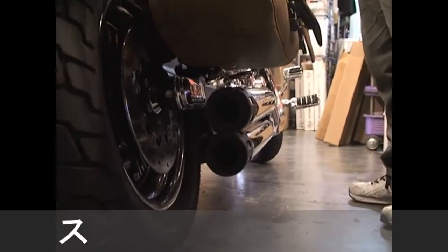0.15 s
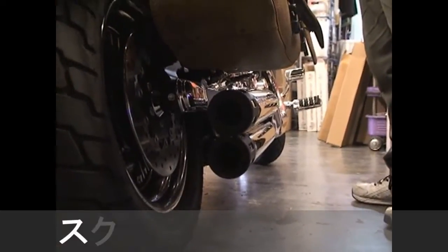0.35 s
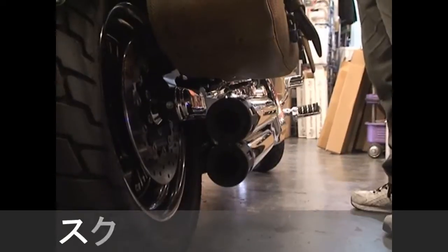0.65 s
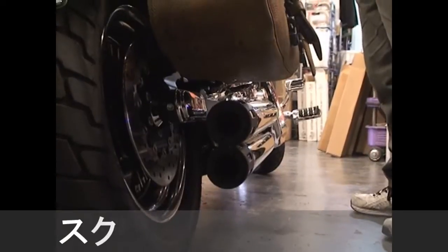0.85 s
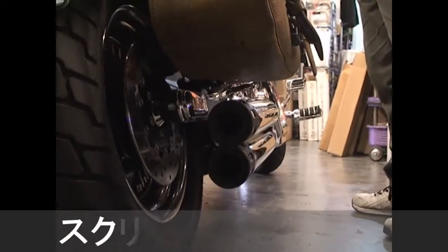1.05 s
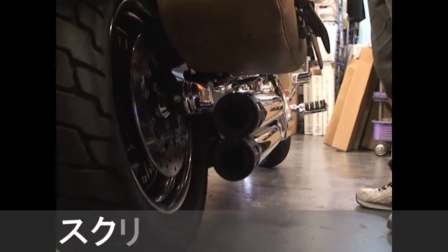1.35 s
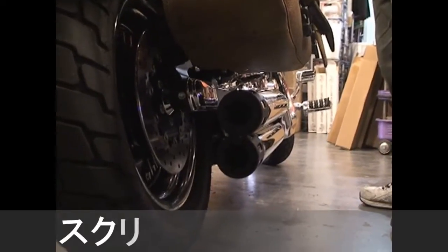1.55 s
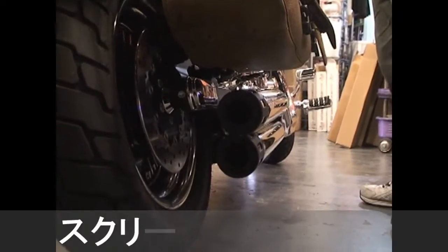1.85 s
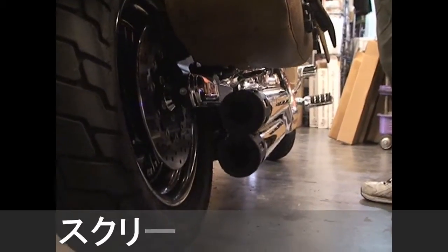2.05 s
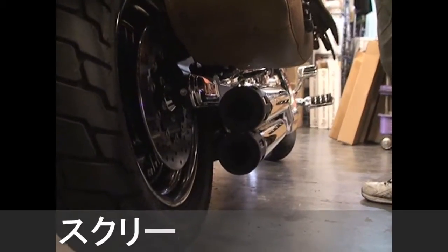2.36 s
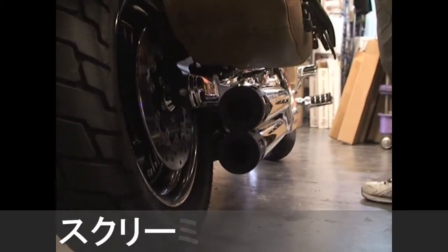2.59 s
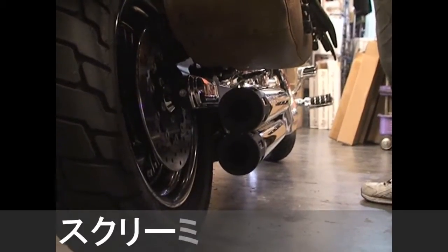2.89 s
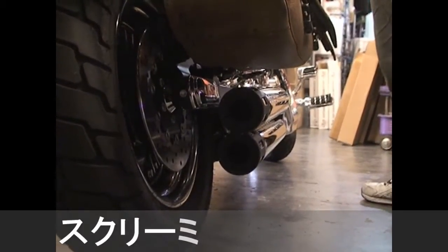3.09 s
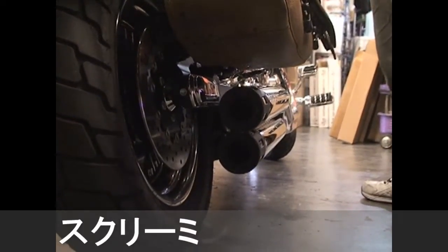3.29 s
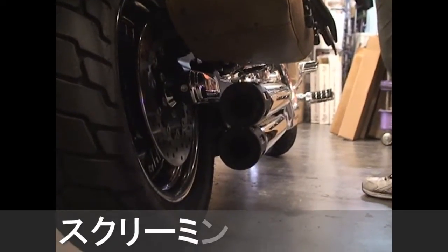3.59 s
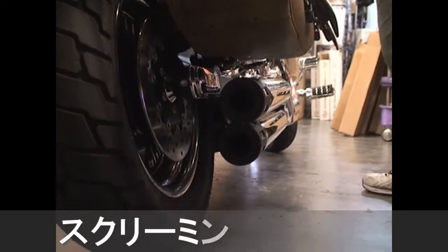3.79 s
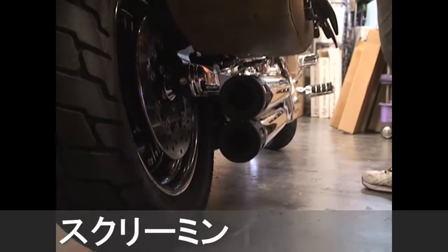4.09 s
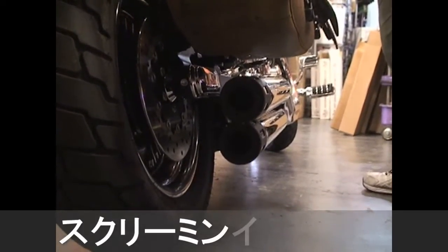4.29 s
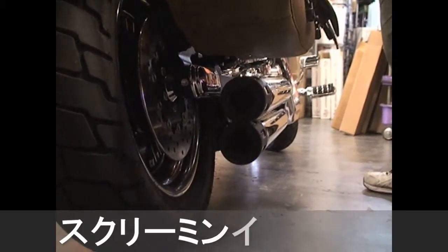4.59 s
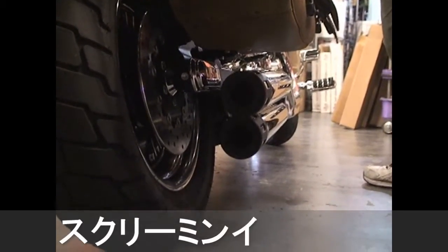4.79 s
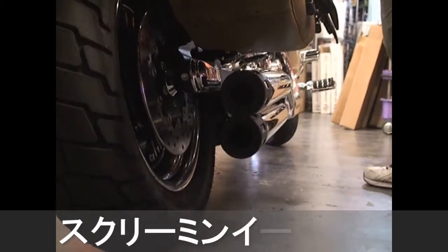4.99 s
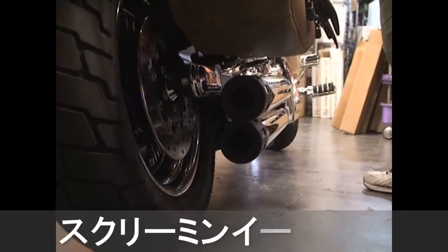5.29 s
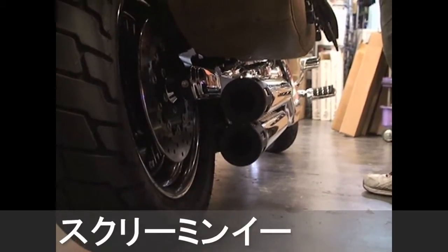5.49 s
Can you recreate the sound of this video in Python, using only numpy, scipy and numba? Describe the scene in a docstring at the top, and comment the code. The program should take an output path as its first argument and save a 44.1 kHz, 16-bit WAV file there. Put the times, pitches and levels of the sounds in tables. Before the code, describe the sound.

A hard-surfaced workshop with low ventilation rumble, faint hiss and a soft hum. At 0.2 s a small sharp plastic switch snap, then a double snap, stronger on its second click, near 0.75 s. At 1.5 s the starter clanks in with a bright scrape and noisy gear grinding; its rough whine races, sags and slams in again around 1.9 and 2.1 s, with dull thuds and soft exhaust chuffs. At about 2.16 s the big V-twin catches with a rich bark and quick rise, the starter dropping out by 2.4 s. Until 4.7 s it runs at a fast, uneven paired-beat idle: deep boom, spitting gas, hollow cracks, tapping valves and chain rattle. At 4.75 s the throttle snaps open with an airy intake rasp and thin whistles, the beats crowding into a roar; a second, smaller blip comes at 5.15 s, falling toward idle by 5.6 s. Microphone close behind the mufflers, with short room reflections.

```python
"""A big V-twin motorcycle engine catches, idles in uneven pairs of beats and is blipped, close behind its two mufflers.
Each beat rings pipes, headers and mufflers and spits a burst of gas noise; the valve gear taps and clatters.
Before it fires, switches snap and the starter's gear teeth grind noisily through three compressions.
Ventilation noise and hum lie beneath, and decaying diffuse reflections give the hard room of a workshop."""
import sys
import numpy as np
from scipy import signal
from scipy.fft import rfft, irfft
from scipy.io import wavfile
from scipy.ndimage import uniform_filter1d
from numba import njit

SR = 44100
rng = np.random.default_rng(int(sys.argv[2]) if len(sys.argv) > 2 else 0)


def unload_wav(signal):
    """Save mono or channel-first audio to the path in sys.argv[1] as 16-bit WAV at rate SR, clipped to [-1, 1]."""
    wavfile.write(
        sys.argv[1],
        SR,
        np.round(np.clip(np.atleast_2d(signal).T, -1, 1) * 32767).astype(np.int16),
    )


N = 249165
T = np.arange(N) / SR

# crankshaft speed once the engine fires: (time [s], speed [turns/min])
CRANK_SPEED = [(2.16, 1003.0), (2.32, 1251.0), (2.41, 1402.0), (3.15, 1347.0), (3.29, 1294.0),
               (3.56, 1350.0), (3.67, 1304.0), (4.71, 1200.0), (4.88, 2126.0), (5.14, 2212.0),
               (5.23, 1894.0), (5.64, 1360.0)]
FIRST_BEAT_S = 2.16
# deep resonances of the rear cylinder's pipe: (frequency [Hz], width [Hz], level [dB], polarity [+1 or -1])
REAR_PIPE_MODES = [(49.3, 10.3, -6, -1), (102.8, 13, 5.5, 1), (172, 25.7, 1, 1), (168, 144, -7.5, -1),
                   (302, 45, -14.5, 1)]
# starter drive, racing after each compression and braked by the next:
# (time [s], tooth rate [Hz], relative whine level [dB])
STARTER_TEETH = [(1.5, 800, -42), (1.58, 940, -30), (1.6, 1000, -44), (1.65, 1410, -44), (1.665, 1430, -25),
                 (1.69, 1390, -23), (1.715, 1070, -23), (1.745, 1060, -29), (1.78, 1120, -24),
                 (1.805, 760, -28), (1.835, 570, -21), (1.865, 550, -32), (1.893, 520, -42),
                 (1.897, 1520, -29), (1.92, 1130, -21), (1.955, 740, -25), (1.982, 560, -23),
                 (2.01, 500, -35), (2.078, 450, -48), (2.085, 1750, -30), (2.11, 1180, -23),
                 (2.132, 830, -24), (2.152, 790, -27), (2.162, 580, -16), (2.178, 540, -17),
                 (2.21, 520, -45)]


def undb(db):
    """Decibels to gain."""
    return 10 ** (np.asarray(db) / 20)


def curve(rows, axis=1):
    """One column of a table, joined by straight lines in time."""
    rows = np.array(rows)
    return np.interp(T, rows[:, 0], rows[:, axis])


def unit(x, span=slice(None)):
    """Scale to rms 1 within a span."""
    return x / np.sqrt(np.mean(x[..., span] ** 2))


def noise():
    """White noise."""
    return rng.standard_normal(N)


def waver(samples):
    """Random drift of rms 1: white noise averaged over a number of samples."""
    return unit(uniform_filter1d(noise(), size=samples))


def colour(x, points):
    """Causal minimum-phase filter of unit power through (frequency [Hz], relative level [dB]) points."""
    hz, db = np.transpose(points)
    size = 4096
    bins_hz = np.arange(size // 2 + 1) * SR / size
    gain = unit(undb(np.interp(np.log(bins_hz + 1), np.log(hz), db)))
    # folding the cepstrum forward in time makes the filter causal
    cepstrum = irfft(np.log(gain))
    cepstrum[1:size // 2] *= 2
    cepstrum[size // 2 + 1:] = 0
    impulse = irfft(np.exp(rfft(cepstrum)))
    return signal.fftconvolve(x, impulse)[:N]


@njit
def resonate(x, hz, width):
    """Band-pass with a moving centre, gain 1 there."""
    y, band, low = np.empty(len(x)), 0., 0.
    for i in range(len(x)):
        g = np.tan(np.pi * hz[i] / SR)
        damping = width / hz[i]
        # the tiny offset keeps the states out of very slow, denormal numbers
        v = (band + g * (x[i] + 1e-18 - low)) / (1 + g * (g + damping))
        band = 2 * v - band
        low = low + 2 * g * v
        y[i] = damping * v
    return y


def ring(x, modes, stretch=1):
    """A bank of (frequency [Hz], width [Hz], level [dB]) resonances, all frequencies times stretch."""
    return sum(undb(db) * resonate(x, hz * stretch * np.ones(N), float(width)) for hz, width, db in modes)


def strikes(times, sizes):
    samples = np.maximum(np.asarray(times) * SR, 0).astype(int)
    return np.bincount(samples, sizes, N)[:N]


def fade(x, decay_s):
    """Give each impulse an exponential tail."""
    return signal.lfilter([1], [1, -np.exp(-1 / (abs(decay_s) * SR))], x)


def place(x, pan_db, room_db, t60=0.2, first_s=0.00492):
    """Direct sound, left minus right in dB, plus diffuse reflections that differ at each ear."""
    t = T[:SR // 2]
    tail = rng.standard_normal((2, len(t))) * np.exp(-np.log(1000) * t / t60) * (t > first_s)
    tail /= np.sqrt(np.sum(tail ** 2, axis=1, keepdims=True))
    reflections = signal.fftconvolve(x[None], tail, axes=1)[:, :N]
    return (x + undb(room_db) * reflections) * undb([[pan_db / 2], [-pan_db / 2]])


def ports(x, pan_db):
    """Close to the pipes both channels carry the same wave, shifted in level and phase."""
    # phase by which left leads right: (frequency [Hz], lead [radians])
    port_phase = [(0, 0), (60, 0.83), (110, 0.37), (200, 0.67), (400, 0.97)]
    hz, lead = np.transpose(port_phase)
    turn = np.exp(.5j * np.interp(np.arange(N // 2 + 1) * SR / N, hz, lead))
    return irfft(rfft(x) * np.array([turn, turn.conj()]), N) * undb([[pan_db / 2], [-pan_db / 2]])


def workshop():
    """Ventilation rumbles and hisses, wavering a little in level, over hums made of narrow noise bands."""
    # ventilation noise: (frequency [Hz], relative level [dB])
    air_colour = [(15, -30), (25, -15), (48, -8.5), (66, -21), (103, -21), (130, -13), (183, -13.5),
                  (237, -13), (342, -17.5), (370, -21.5), (770, -29), (878, -29), (3080, -38.5),
                  (9500, -42), (13000, -53)]
    # ventilation hums: (frequency [Hz], level [dB])
    hum_tones = [(98, -49), (340, -59), (888, -69.5)]
    hum = sum(undb(db) * unit(ring(noise(), [(hz, 6, 0)])) for hz, db in hum_tones)
    air = unit(colour(noise(), air_colour)) * undb(1.0 * waver(SR // 8))
    return place(undb(-48.5) * air + hum, 0.18, -6.0)


def switches():
    """Handlebar switches: small, sharp plastic snaps of noise that ring their housing."""
    # snaps: (time [s], relative level [dB])
    snap_events = [(0.211, -25.5), (0.7477, -24.5), (0.7664, -18)]
    # colour of the snaps: (frequency [Hz], relative level [dB])
    snap_colour = [(1500, -35), (2500, -17), (3200, -7), (4100, -6), (5300, -1), (6900, -1), (8300, -3),
                   (9500, -8), (12000, -11), (14000, -15)]
    # ringing of the housing: (frequency [Hz], width [Hz], level [dB])
    housing_modes = [(3200, 500, 4), (5300, 450, 3), (6900, 500, -2), (8350, 600, -6)]
    s, db = np.transpose(snap_events)
    snap = fade(strikes(s, undb(db)), 0.0019) * noise()
    snap = snap + ring(snap, housing_modes)
    return place(undb(-3.0) * colour(snap, snap_colour), 2.7, -6.5, t60=0.26)


def cranking():
    """Tooth rate and grinding dB: each stroke takes hold, stays loud and dies away; faster teeth are louder."""
    # heaves over a compression:
    # (takes hold [s], starts to die away [s], relative grinding level [dB], decay [s])
    strokes = [(1.503, 1.715, -18, 0.52), (1.9, 1.946, -16, 0.18), (2.077, 2.113, -17, 0.41)]
    free_tooth_hz, grind_db_per_octave = 1450, 2.5  # tooth rate between compressions; rise with tooth rate
    hz, db = curve(STARTER_TEETH), np.full(N, -np.inf)
    for start, loudest, top_db, decay_s in strokes:
        dying = np.exp(-np.maximum(T - loudest, 0) / decay_s)
        db = np.where(T >= start, top_db + 20 * np.log10(dying), db)
    return hz, db + grind_db_per_octave * np.log2(hz / free_tooth_hz)


def starter():
    """Gear teeth strike unevenly and ring the case; the drive slams in again after each compression."""
    # colour of grinding and metal blows: (frequency [Hz], relative level [dB])
    grind_colour = [(71, -77), (120, -19), (190, 4), (474, -8), (556, -0.5), (614, 2.5), (1450, -5),
                    (1570, -7), (1760, -0.5), (1990, -4), (4500, -2.5), (9980, -14.5), (12700, -48),
                    (14000, -82)]
    # ringing of the gear case: (frequency [Hz], width [Hz], level [dB])
    case_modes = [(566, 34, 8), (805, 30, 8), (1070, 60, 7), (1410, 20, 8), (1760, 70, 10), (2517, 25, 8),
                  (2842, 14, 23), (3890, 25, 7), (4450, 77, 3), (7170, 90, 3), (7750, 90, 6)]
    # gear mesh tone and overtones: (multiple of the tooth rate, relative level [dB])
    mesh_orders = [(1, 0), (2, -10), (3, -16)]
    # blows of the drive and first coughs: (time [s], metal level [dB], thud level [dB], decay [s])
    drive_blows = [(1.493, -30, -59, 0.065), (1.529, -19, -24, 0.11), (1.824, -29, -13, 0.029),
                   (1.897, -21, -24, 0.15), (1.968, -28, -14.5, 0.015), (2.077, -22.5, -19, 0.029),
                   (2.157, -42, -21.5, 0.074)]
    # colour of the thuds: (frequency [Hz], relative level [dB])
    thud_colour = [(40, -4), (120, -5.5), (200, 9), (380, -2), (560, 6), (800, -5.5), (1300, -14),
                   (3000, -66)]
    on_s, off_s = 1.4995, 2.383
    engaged = np.clip((T - on_s) / 0.00059, 0, 1) * np.clip((off_s - T) / 0.053 + .5, 0, 1)
    mesh_hz, grind_db = cranking()
    effort = engaged * undb(grind_db)
    # the tooth rate wavers, both quickly and more slowly
    tooth_hz = mesh_hz * (1 + .035 * waver(150) + 0.012 * waver(900))
    # one impulse of random strength for each tooth
    contacts = np.diff(np.floor(np.cumsum(tooth_hz) / SR), prepend=0) * undb(6.3 * np.minimum(noise(), 2))
    rasp = unit(unit(contacts - contacts.mean()) + 2.0 * noise())

    # backlash smears the mesh tone and its overtones into a rough, gliding whine
    turn = 2 * np.pi * np.cumsum(tooth_hz) / SR
    whine = unit(sum(undb(db + 4 * waver(200)) * np.sin(order * turn) for order, db in mesh_orders))
    whine = whine * engaged * undb(-1.5 + curve(STARTER_TEETH, axis=2))

    # a broad rasp follows just below the mesh tone
    churn = ring(rasp, [(0.81, 700, 0)], tooth_hz)
    churn = unit(ring(churn, [(1060, 5600, 0)]))
    # the pinion scrapes brightly as it goes home
    scrape = unit(ring(ring(noise(), [(6750, 4000, 0)]), [(7060, 3700, 0)]))
    scrape = scrape * np.exp(-np.maximum(T - on_s, 0) / 0.13)
    gears = undb(-1.5) * colour(rasp, grind_colour) + undb(-13.0) * unit(ring(rasp, case_modes))
    gears = effort * (gears + undb(-10) * churn + undb(2.0) * scrape)

    metal = sum(undb(db) * fade(strikes([s], [1]), decay) for s, db, _, decay in drive_blows)
    thuds = sum(undb(db) * fade(strikes([s], [1]), decay) for s, _, db, decay in drive_blows)
    blows = colour(metal * noise(), grind_colour) + colour(thuds * noise(), thud_colour)
    return place(gears + whine + blows, -1.1, -5.0, t60=0.28)


def chuffs():
    """Unfired charges pushed out while cranking thump softly in the rear pipe's resonances."""
    # thumps: (time [s], relative level [dB])
    chuff_events = [(1.825, 14), (1.892, 19), (1.997, 31.5)]
    s, db = np.transpose(chuff_events)
    charges = strikes(s, undb(db))
    thumps = sum(np.sign(sign) * ring(charges, [mode]) for *mode, sign in REAR_PIPE_MODES)
    return ports(thumps, -2.0)


def gulp():
    """The snapped-open throttle rasps, and thin whistles glide at the edge of its plate."""
    # rasp while the engine gulps air: (time [s], level [dB])
    rasp_level = [(4.76, -60), (4.81, -27), (4.885, -27), (4.95, -30), (4.98, -60)]
    # whistles at the throttle plate: (starts [s], ends [s], first pitch [Hz], last pitch [Hz], level [dB])
    whistles = [(4.752, 4.83, 5480, 5640, -31), (4.785, 4.828, 7850, 7620, -28),
                (4.86, 4.965, 5720, 5280, -34)]
    band = [(6200, 2800, 0)]
    out = unit(ring(ring(noise(), band), band)) * undb(curve(rasp_level))
    out = out * (T > rasp_level[0][0]) * (T < rasp_level[-1][0])
    for start, end, first_hz, last_hz, db in whistles:
        hz = curve([(start, first_hz), (end, last_hz)])
        mode = [(1, 110, 0)]  # a 110 Hz wide band that follows the glide
        swell = np.sqrt(np.abs(np.sin(np.pi * np.clip((T - start) / (end - start), 0, 1))))
        out = out + undb(db) * swell * unit(ring(ring(noise(), mode, hz), mode, hz))
    return place(out, -1.1, -10.0)


def crank_times(angle):
    """Times at which the two-turn cycle passes an angle (in cycles)."""
    cycles = np.cumsum(curve(CRANK_SPEED) * (T > FIRST_BEAT_S)) / SR / 120  # two turns a cycle
    return np.interp(np.arange(angle, cycles[-1]) + 1e-9, cycles, T)


def throttle_opening():
    """Each twist opens the throttle, holds it and lets it fall shut."""
    # twists: (opens [s], starts to close [s], opening [0-1])
    twists = [(2.16, 2.27, 0.52), (4.741, 4.992, 1), (5.153, 5.43, 0.52)]
    open_s, close_s = 0.038, 0.21
    return sum(opening * np.clip((T - opens) / open_s, 0, 1) * np.clip(1 - (T - closes) / close_s, 0, 1)
               for opens, closes, opening in twists)


def intake_rush(throttle, running):
    """Air drawn past the open throttle hisses in proportion to its opening."""
    # colour of the rush: (frequency [Hz], relative level [dB])
    intake_colour = [(1000, 14), (4000, -9), (5800, 1), (7800, 7), (9000, -2), (10500, -0.5), (11800, 5),
                     (13500, -31)]
    return throttle * running * colour(noise(), intake_colour)


def chain_rattle(beats, running, idle_span):
    """Chain and gears rattle on between the valve taps, most just after a firing."""
    # colour of the rattle: (frequency [Hz], relative level [dB])
    rattle_colour = [(300, -4), (900, 7), (1600, -13.5), (3200, -5), (6400, -2.5), (8000, -5.5),
                     (9500, -10.5), (10500, -30), (11700, -12), (13000, -48)]
    shaken = 0.93 + 0.068 * unit(fade(strikes(beats, None), 0.077), idle_span)
    return colour(running * shaken * noise(), rattle_colour)


def valve_gear():
    """Valves close at fixed cam angles; each tap rings the rocker boxes in a different mix and tuning."""
    # valve closings: (cam angle [cycles], relative level [dB])
    closings = [(0.225, 12), (0.345, 11.5), (0.67, 13.5), (0.819, 4)]
    # ringing of the rocker boxes: (frequency [Hz], width [Hz], level [dB])
    rocker_modes = [(2355, 46, 9.5), (3360, 330, 3), (3870, 200, -6), (4720, 96, 7), (5690, 120, 5),
                    (6700, 270, 2.5)]
    detune, scatter_db, tap_s = 0.03, 4, 0.006  # random spread of pitch and level; decay
    times = np.concatenate([crank_times(angle) for angle, _ in closings])
    tap_db = np.concatenate([np.full(len(crank_times(angle)), db) for angle, db in closings])
    latest = np.searchsorted(np.sort(times), T)
    out = 0
    for mode in rocker_modes:
        chance = rng.uniform(-1.93, 1, (len(times) + 1, 2))
        taps = fade(strikes(times, undb(tap_db + scatter_db * chance[1:, 0])), tap_s) * noise()
        out = out + ring(taps, [mode], 1 + detune * chance[latest, 1])
    return out


def knocks(racing, heat, span):
    """Pressure waves running between the two pipes knock at fixed cam angles, a little different each cycle."""
    # knocks: (cam angle [cycles], frequency [Hz], width [Hz], relative level [dB])
    pipe_knocks = [(-0.015, 945, 270, -44.5), (0.214, 611, 110, -39), (0.21, 930, 200, -48),
                   (0.224, 313.7, 49, -33.5), (0.241, 324.8, 12.6, -36), (0.251, 197, 72, -28),
                   (0.395, 553, 150, -35), (0.455, 920, 200, -47), (0.482, 318, 53, -37.5),
                   (0.812, 572, 110, -41.5)]
    scatter_db, detune = 1.3, 0.02  # random spread from cycle to cycle
    out = 0
    for angle, hz, width, db in pipe_knocks:
        times = crank_times(angle % 1)
        chance = rng.standard_normal((len(times) + 1, 2))
        # retuned 5 ms before each knock begins
        tuning = heat * (1 + detune * chance[np.searchsorted(times - .005, T), 1])
        mode = [(hz, width, 0)]
        hits = strikes(times, undb(scatter_db * chance[1:, 0]))
        waves = ring(ring(hits, mode, tuning), mode, tuning)
        out = out + undb(db) * unit(waves, span)
    return out * undb(-9 * racing)  # softer as the engine races


def slap(beats):
    """The steep front of each puff leaves the muffler mouth as a short, hollow crack."""
    # ringing of the mouth: (frequency [Hz], width [Hz], level [dB])
    mouth_modes = [(650, 140, -11), (944, 71, -5), (1360, 710, -12)]
    pulses = strikes(beats, undb(4.7 * rng.standard_normal(len(beats))))
    burst = unit(fade(pulses, 0.0056)) * noise()
    return ring(unit(pulses) + undb(24.0) * burst, mouth_modes)


def gas_jet(beats):
    """The jet tears out just after each pressure front, in ragged bursts that each have their own colour."""
    # beats that crack out above the others: (time [s], extra level [dB])
    loud_cracks = [(2.161, 4), (2.453, 1), (2.552, 2), (2.624, 2.5), (2.8, 1), (3.015, 2.5), (3.283, 2.5),
                   (3.557, 3), (3.646, 4.5), (4.072, 2.5), (4.115, 1.5), (4.263, 2.5), (4.362, 4),
                   (4.701, 5.5), (4.75, 7), (4.786, 2), (4.8245, 3), (4.854, 3.5), (4.885, 6.5), (4.94, 5),
                   (5.2467, 7), (5.285, 6.5), (5.385, 7), (5.424, 8), (5.455, 6.5)]
    # colour of the gas jet: (frequency [Hz], relative level [dB])
    gas_colour = [(600, 11), (1700, -2), (3200, 6.5), (4500, 5.5), (6500, 6), (8000, 3), (9500, -2.5),
                  (10500, -14.5), (11700, -4.5), (13000, -105)]
    times, extra_db = np.sort(beats) + 0.00027, np.zeros(len(beats))
    for s, db in loud_cracks:
        nearest = np.argmin(abs(times - s))
        times[nearest], extra_db[nearest] = s, db
    # each burst's hiss peak is drawn around 4200 Hz
    peak_hz = 4200 * 2 ** (0.55 * rng.uniform(-0.75, 1, len(times) + 1))
    puffs = fade(fade(strikes(times, undb(extra_db)), 0.0024), 0.0024)
    jet = puffs * noise() * undb(2 * waver(30))
    jet = jet + ring(jet, [(0.98, 700, 3)], peak_hz[np.searchsorted(times, T)])
    return colour(jet, gas_colour)


def exhaust(beats, pipe, throttle, heat):
    """One cylinder: each blow-down rings its pipe, and the turbulent flow behind it rings it unevenly."""
    # resonances of the header pipes: (frequency [Hz], width [Hz], level [dB])
    header_modes = [(205, 30, -6), (245, 24, 0), (318, 20, 7), (390, 36, -1)]
    # overtones of the mufflers: (frequency [Hz], width [Hz], level [dB])
    muffler_modes = [(295, 30, 10), (402, 65, 5), (528, 135, 1.5), (640, 52, -19), (885, 10.7, 5.5),
                     (960, 31, -52), (1278, 48, -1), (1400, 62, -33), (1771, 48, -6), (1890, 25, -8.5),
                     (2240, 26, -4.5), (2650, 36, -16)]
    # low buffeting by each puff: (frequency [Hz], relative level [dB])
    buffet_colour = [(12, -20), (22, -6), (32, 2), (42, -4), (55, -18), (90, -27), (300, -48)]
    chance = rng.standard_normal((len(beats), 2)).T
    pulses = unit(strikes(beats + 0.00018 * chance[0], undb(1.0 * chance[1])))
    flow = unit(fade(pulses, .014)) * noise()

    # turbulence in the pipe grows with the throttle
    drive = pulses + undb(-19 + 11 * throttle) * flow
    boom = 0
    for hz, width, db, sign in pipe:
        # under throttle the boom narrows onto the strongest resonance, near 100 Hz
        narrowed = drive * undb(-9 * throttle * abs(np.log2(hz / 100)))
        boom = boom + np.sign(sign) * ring(narrowed, [(hz, width, db)], heat)

    # the headers get turbulence after each beat, and a steady roar between beats under throttle
    header_drive = pulses + undb(-7) * flow + undb(-9) * throttle ** 2 * noise()
    # the growl sinks as the throttle shuts and the gas in the headers cools
    header_tuning = heat * (1 - 0.07 * (1 - throttle))
    growl = ring(ring(header_drive, header_modes, header_tuning), [(229.0, 32, 0)])

    muffler_flow = unit(fade(pulses, 0.03)) * noise()
    bark = ring(pulses + undb(7.5) * muffler_flow, muffler_modes, np.sqrt(heat))
    return np.array([boom, growl, bark, colour(flow, buffet_colour)])


def engine():
    """Two cylinders 45 degrees apart fire 315 and 405 degrees after each other."""
    # running engine: (time [s], relative boom level [dB], relative treble level [dB])
    running_level = [(2.2, -28, -22.5), (2.38, -19.5, -24.5), (2.65, -19.5, -29), (3.8, -18, -29.5),
                     (4.66, -15, -27.5), (4.78, -19.5, -29), (4.9, -22.5, -31.5), (5.0, -11.5, -34.5),
                     (5.14, -15.5, -25), (5.4, -16.5, -31), (5.52, -19.5, -34.5), (5.64, -21, -37)]
    # deep resonances of the front cylinder's pipe:
    # (frequency [Hz], width [Hz], level [dB], polarity [+1 or -1])
    front_pipe_modes = [(52.4, 6.1, -2.5, -1), (103.3, 12.6, 3, 1), (173.3, 8.2, 2.5, 1),
                        (211, 49.4, -2.5, -1), (217, 17, -2, 1), (300.6, 5.2, -10, 1)]
    idle_span = slice(3 * SR, 9 * SR // 2)
    idle_rpm = 1400
    front, rear = crank_times(0), crank_times(315 / 720)
    beats = np.r_[front, rear]
    boom_db, treble_db = curve(running_level, axis=1), curve(running_level, axis=2)
    throttle = throttle_opening()
    load = fade(throttle, 0.075) / (0.075 * SR)  # the manifold takes a moment to fill and to empty
    racing = np.maximum(curve(CRANK_SPEED) / idle_rpm - 1, 0)  # 1 at twice idle speed
    # racing heats the gas, which lifts the pipes' pitches
    heat_s = 0.87
    warmth = fade(racing, heat_s) / (heat_s * SR)
    heat = 1 + 0.025 * warmth
    running = np.clip((T - FIRST_BEAT_S) / 0.01, 0, 1)
    catching = np.exp(-np.maximum(T - FIRST_BEAT_S, 0) / 0.092)

    cylinders = exhaust(front, front_pipe_modes, throttle, heat) + exhaust(rear, REAR_PIPE_MODES, throttle, heat)
    boom, growl, bark, buffet = [unit(layer, idle_span) for layer in cylinders]
    # as the engine races its beats overlap, so each counts for less
    pipes = boom * undb(boom_db + 4 - 4.2 * racing) + growl * undb(-35 + 18 * load)
    buffet = buffet * undb(boom_db - 15 - 9 * racing)
    # the first, rich firings bark louder; the bark softens as the pipes heat up
    bark = bark * undb(-29 + 1 * throttle + 11.5 * catching - 23.5 * warmth)

    rear_lag_s = 0.0011  # the rear cylinder's gas arrives a little later
    gas = unit_gas = gas_jet(np.r_[front, rear + rear_lag_s])
    gas = unit(unit_gas, idle_span) * undb(treble_db - 4 + 1.0 * throttle - 0.83 * racing)
    crack = unit(slap(beats), idle_span) * undb(-47.5 + 11 * throttle)
    clatter = chain_rattle(beats, running, idle_span) * undb(treble_db - 2.5)
    clatter = clatter + undb(-37) * unit(valve_gear(), idle_span)
    intake = intake_rush(throttle, running) * undb(treble_db + 5.5)
    return (ports(pipes, -2.6)
            + buffet * np.array([[0], [1]])  # right channel only
            + place(bark, -1.7, -1.0, t60=1.0)
            + place(knocks(racing, heat, idle_span), -1.8, -6.5)
            + place(gas + crack, -.3, -7.5, t60=0.19)
            + place(clatter + intake, -1.3, -8.5))


def scene():
    """All sources in the one room."""
    return workshop() + switches() + starter() + chuffs() + gulp() + engine()


def record(dry):
    """Soft saturation rounds the highest peaks and a steep low-pass cuts the top."""
    ceiling, top_hz = 1.1, 13800
    rounded = ceiling * np.tanh(dry / ceiling)
    return signal.sosfilt(signal.ellip(8, .2, 70, top_hz, fs=SR, output="sos"), rounded)


dry = scene()
out = record(dry)
unload_wav(out)
```